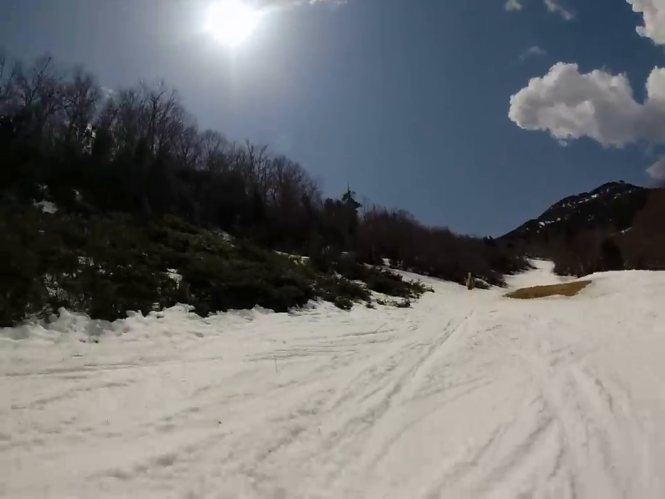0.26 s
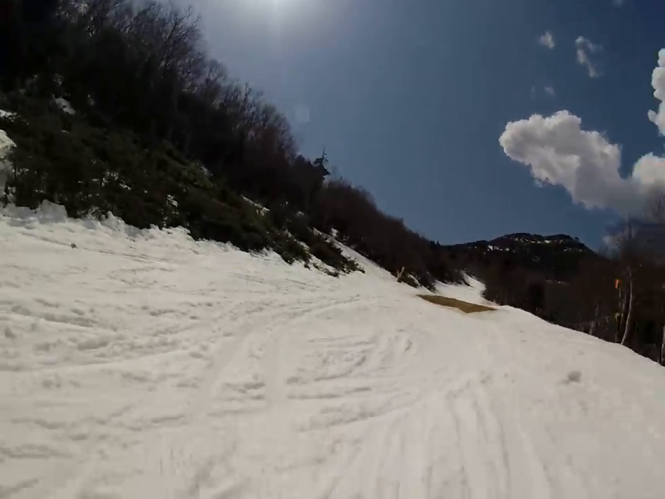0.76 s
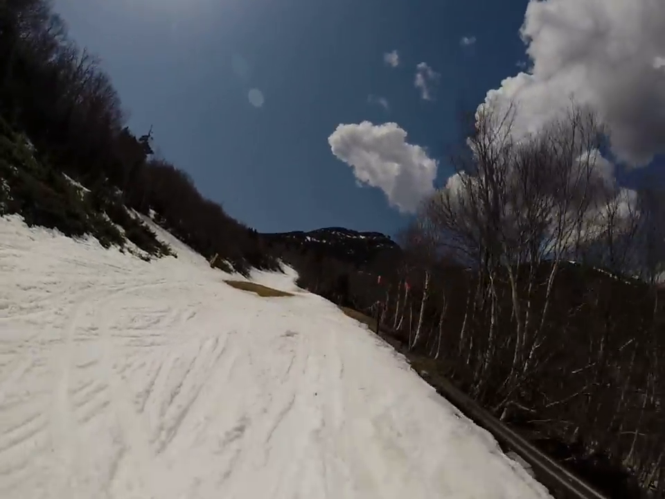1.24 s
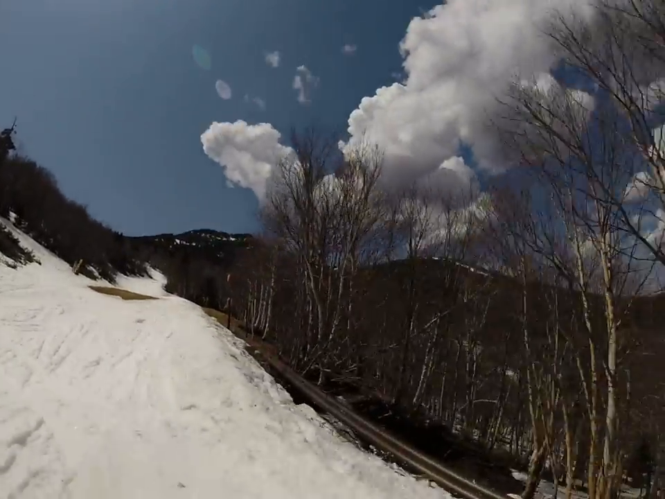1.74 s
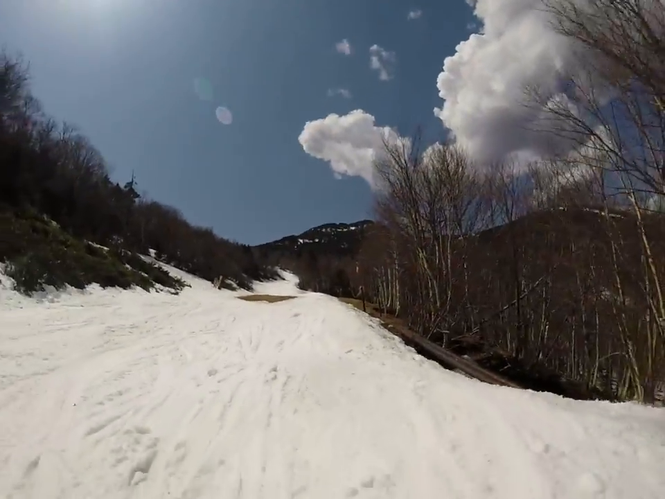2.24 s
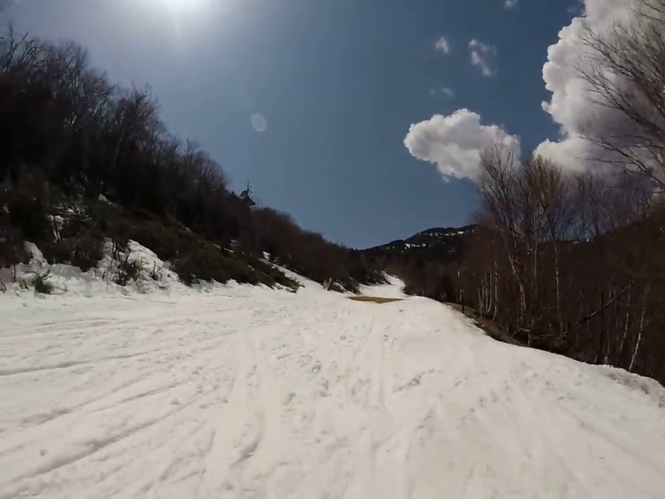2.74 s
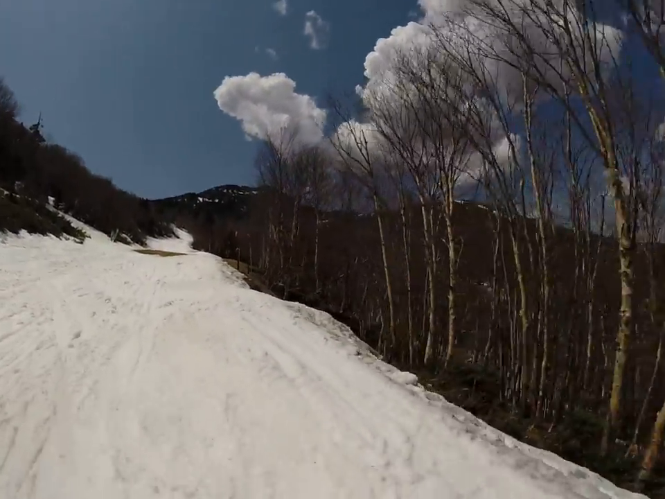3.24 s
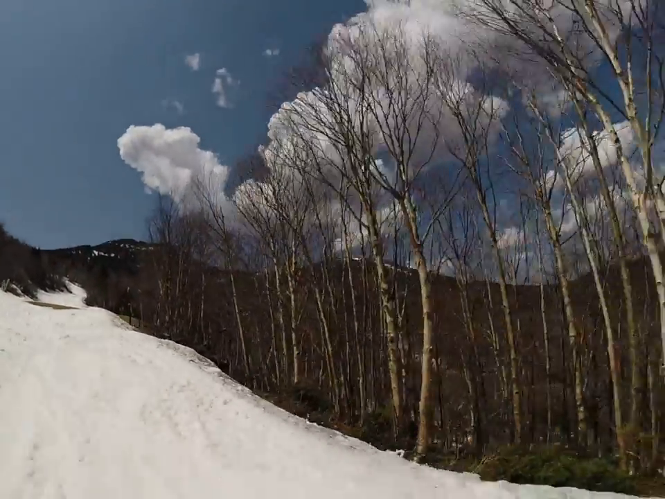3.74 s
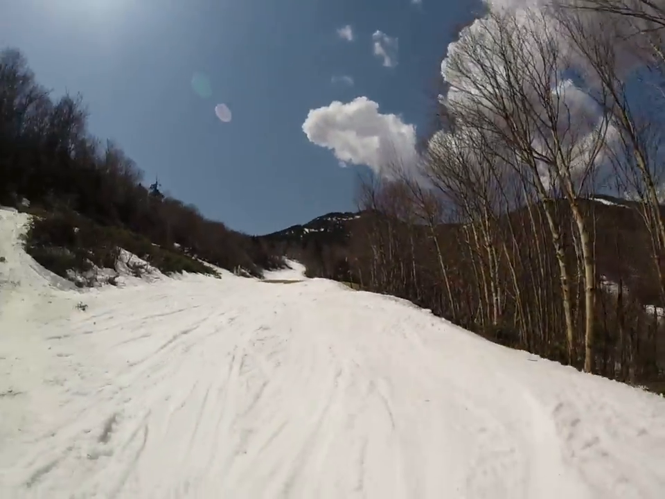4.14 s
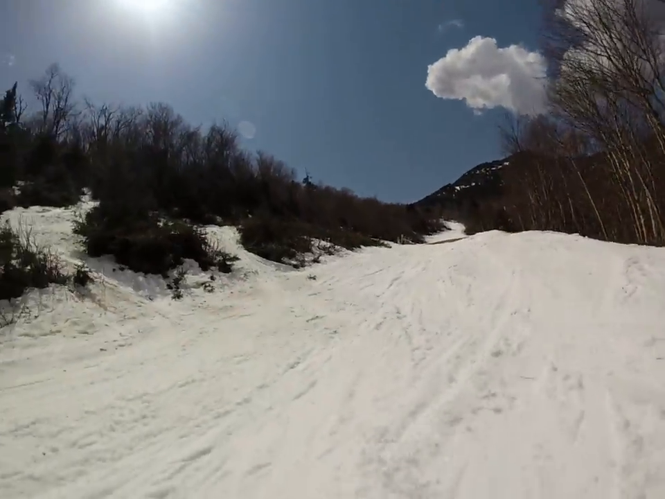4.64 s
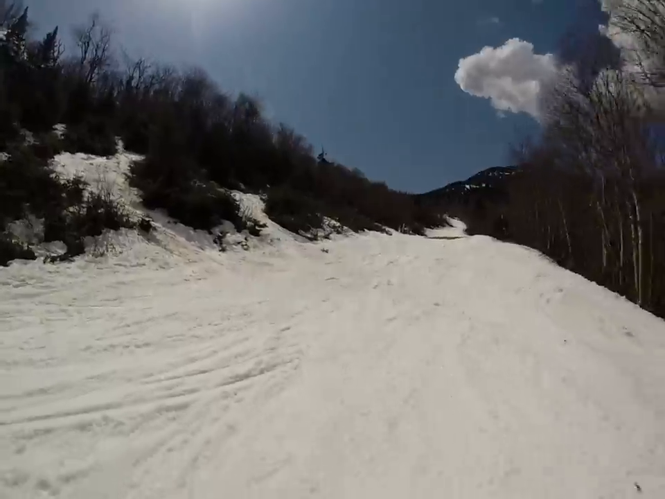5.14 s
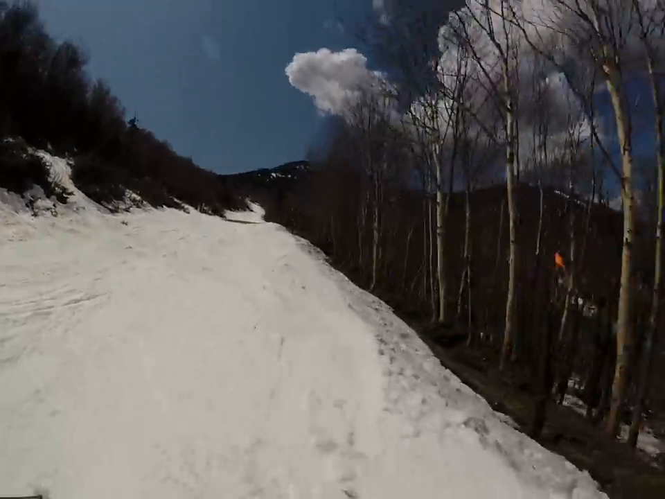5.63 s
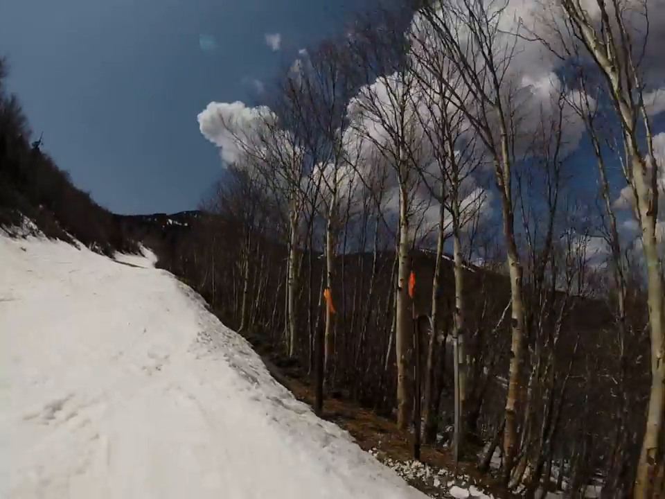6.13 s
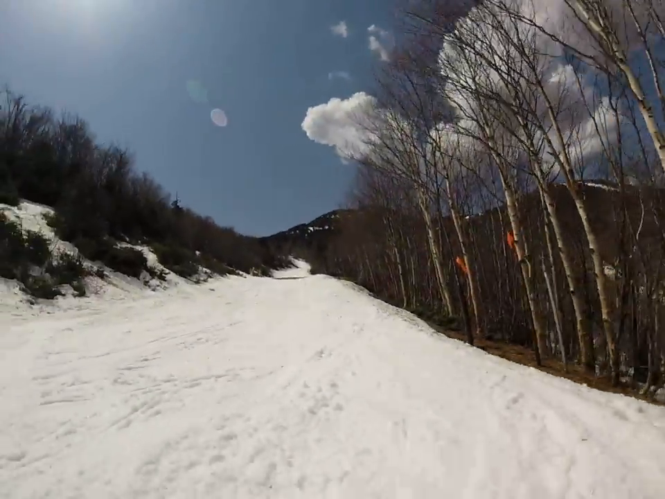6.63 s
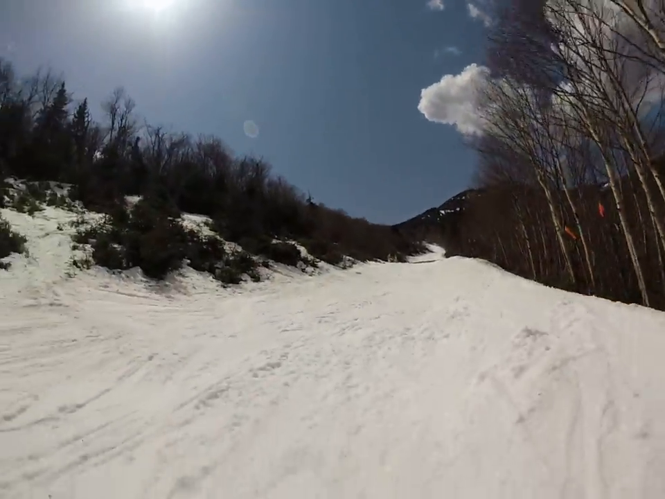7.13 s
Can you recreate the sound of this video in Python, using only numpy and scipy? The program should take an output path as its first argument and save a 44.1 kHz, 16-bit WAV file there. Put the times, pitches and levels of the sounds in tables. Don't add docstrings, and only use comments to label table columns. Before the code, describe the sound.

Heard from inside a small plastic camera case on a skier's helmet: slush scrapes and hisses under the skis in uneven surges, with wind rumbling and fluttering behind. A sharp knock of the mount comes early, another mid-run and a third near the end, with small taps, rattles and dull jolts between. The wettest, crunchiest carve comes around six seconds.

```python
import sys
import numpy as np
from scipy import signal
from scipy.fft import rfft, irfft, next_fast_len
from scipy.io import wavfile
from scipy.ndimage import uniform_filter1d, map_coordinates

SR = 44100
rng = np.random.default_rng(int(sys.argv[2]) if len(sys.argv) > 2 else 0)


def gain_from_decibels(decibels):
    exponent = np.asarray(decibels, float) / 20
    return 10 ** exponent


def persist_wave(psi):
    counts = np.round(np.clip(psi, -1, 1) * 32767).astype(np.int16)
    wavfile.write(sys.argv[1], SR, np.atleast_2d(counts).T)


N = 325458

# f/Hz, level/dB per Hz
AIR_RUSH = [(88, -31), (150, 9.5), (974, -12), (1550, -9), (1840, 1), (2270, -11), (2760, -22), (7230, -8),
            (8440, -41), (13100, -41), (15000, -39)]
# f/Hz, level/dB per Hz
BUFFET = [(5.9, -64), (10, 11.5), (27, 12), (41, -15), (81, -11), (139, -22), (224, -28.5), (576, -32.5),
          (700, -34), (910, -38.5), (1540, -120)]
# start t/s, end t/s, buffet level/dB
GUSTS = [(.62, .66, -38.5), (.81, .85, -35), (.95, 1.09, -37), (1.18, 1.23, -37.5), (1.33, 1.36, -39),
         (1.53, 1.62, -31), (1.75, 1.82, -32.5), (1.99, 2.02, -41.5), (2.45, 2.48, -31),
         (2.52, 2.75, -38.5), (2.98, 3.2, -38), (3.32, 3.34, -30), (3.52, 3.58, -30.5), (3.98, 4.25, -36.5),
         (4.44, 4.66, -38), (4.74, 4.76, -29), (4.87, 4.9, -33), (5.05, 5.14, -38), (5.34, 5.37, -38),
         (5.47, 5.5, -37), (5.76, 5.87, -38), (5.95, 6.05, -38), (6.08, 6.18, -35), (6.43, 6.57, -34.5),
         (6.67, 6.69, -42), (6.75, 6.77, -36), (6.89, 7.2, -37.5), (7.32, 7.38, -36)]
# f/Hz, width/Hz, level/dB
SWAY = [(39.2, 7, 0)]
# f/Hz, level/dB per Hz
HISS = [(1500, -26), (3500, -3), (6500, -1.5), (7600, 0), (8300, -8.5), (10000, -10), (12500, -15),
        (15500, -20.5)]
# t/s, hiss level/dB
AIRFLOW = [(0.0, -61), (0.12, -59.5), (0.45, -63), (1.3, -64.5), (1.72, -56), (2.2, -71), (2.45, -59),
           (3.0, -69.5), (3.3, -60), (3.55, -58.5), (4.12, -67.5), (4.4, -59), (5.06, -59), (5.14, -67),
           (5.9, -59), (6.7, -63), (7.0, -57), (7.38, -61)]
# t/s, length/s, change/dB
SHELTER = [(.83, 0.046, -4), (0.9, 0.13, 5), (1.362, 0.068, -5), (1.46, 0.085, -1.5), (1.62, 0.12, -9),
           (2.238, 0.028, 5), (2.336, 0.094, -4), (3.048, 0.055, 6), (3.13, .04, -6), (3.167, 0.024, 5),
           (3.204, 0.036, -5), (5.528, .04, 0), (5.59, 0.026, -7), (5.64, 0.038, 4), (6.157, 0.098, -5),
           (6.22, 0.021, 7), (6.75, 0.04, -5), (7.196, 0.15, -4.5)]

# t/s, peak level/dB, direction, f/Hz
JOLTS = [(0.0035, -26, 1, 116.6), (0.429, -31, -1, 129), (0.9993, -33, 1, 85), (1.074, -35, -1, 70),
         (1.153, -27.5, -1, 115), (1.19, -27, -1, 90), (1.5423, -30, -1, 124), (1.76, -17, 1, 47.7),
         (1.79, -20, -1, 69), (2, -24.5, -1, 78.5), (2.1283, -27.5, -1, 91.5), (2.471, -24, -1, 46.3),
         (2.4833, -33, 1, 60), (2.702, -35, 1, 98), (3.024, -32, 1, 71), (3.093, -29, -1, 84),
         (3.467, -21, -1, 70), (3.525, -24, -1, 75), (3.543, -24, 1, 70), (3.5716, -27, -1, 126),
         (3.592, -22, -1, 59.7), (3.994, -31.5, -1, 107), (4.5, -33.5, -1, 120), (4.745, -45, -1, 42),
         (5.7125, -30, 1, 110), (5.742, -32.5, 1, 116), (5.966, -22, -1, 43), (5.989, -37, -1, 37.8),
         (6.02, -21, -1, 37.8), (6.057, -20, -1, 30), (6.085, -21, -1, 33), (6.1145, -15.5, -1, 45),
         (6.141, -20, -1, 46.3), (6.164, -18, -1, 42.3), (6.2614, -24.5, -1, 58.6),
         (6.41, -26.5, -1, 114.8), (6.4376, -27, -1, 61.6), (6.9585, -31.5, 1, 123), (6.994, -30, -1, 117),
         (7.0275, -30.5, -1, 126), (7.115, -25, -1, 61)]
# t/s, peak level/dB, direction, f/Hz
STRAP_SLAPS = [(0.8, -36, -1, 200), (0.851, -43, -1, 260), (0.893, -34.5, 1, 340), (0.917, -35, 1, 280),
               (0.945, -41, 1, 185.2), (1.354, -37, -1, 400), (1.761, -34, 1, 230), (2.128, -30.5, -1, 380),
               (2.7, -35, 1, 170), (2.66, -37, -1, 220), (2.468, -31, -1, 242), (3.005, -42, -1, 230),
               (4.06, -39, -1, 320), (4.085, -33, -1, 382), (4.106, -32.5, -1, 220), (4.754, -27.5, 1, 202),
               (5.411, -44, -1, 220), (5.432, -40, -1, 252), (5.66, -36, -1, 230), (5.693, -34, -1, 230),
               (6.112, -24, -1, 150), (7.111, -26.5, 1, 133)]
# f/Hz, level/dB, t60/s
POLE_MODES = [(1020, -15, 0.007), (1530, 3.5, 0.016), (2070, 3, 0.012), (2450, -12, 0.012),
              (3660, -18, .007), (2870, -3, 0.014), (3280, -9, 0.012), (4440, -4, 0.0079),
              (5700, -11, 0.0041)]
# t/s, peak level/dB
LATCH_THROWN = [
    (0.001, -34),
    (0.367, -32),
    (3.3907, -29),
    (7.183, -28),
]
# t/s, peak level/dB
TAPS = [(0.215, -23.5), (0.3067, -30), (0.3192, -28), (0.395, -31), (0.8904, -36), (1.173, -29),
        (1.3209, -33), (1.5598, -24.5), (1.5958, -26), (1.6631, -32), (1.7587, -22), (2.317, -37),
        (2.9003, -34), (3.011, -35), (3.2965, -30), (3.4805, -29), (3.5064, -33), (3.536, -20),
        (3.5464, -29), (3.5553, -26), (3.5644, -23.5), (3.5754, -23), (3.5844, -30), (3.9679, -32),
        (4.186, -29), (4.4605, -31), (4.4947, -35), (4.6244, -29), (4.6528, -32), (4.6713, -25),
        (4.7516, -32), (4.8384, -31), (5.0569, -29), (5.9484, -32), (6.0533, -22), (6.141, -23),
        (6.1804, -29), (6.3749, -36), (6.9431, -25.5), (7.2085, -37), (7.2335, -35)]
# t/s, peak level/dB, thud level/dB, wall level/dB, tick level/dB
KNOCKS_IN = [(0.1199, -53, -37.5, -40, -28.5), (0.3645, -4.5, -32, -21.5, -26.5),
             (0.9199, -31, -41, -57, -51), (1.1725, -33, -48, -62, -37), (1.214, -35, -56, -62, -37),
             (2.3178, -37, -57, -49, -62), (2.9002, -43, -50, -63, -58), (3.2968, -34, -64, -57, -55),
             (3.3191, -39, -33.5, -34.5, -59), (5.012, -30, -33, -44, -31), (5.616, -31.5, -48, -61, -46),
             (6.1403, -28, -66, -50, -39), (6.212, -50, -55, -60, -40), (6.526, -39, -60, -57, -38),
             (6.539, -37, -68, -57, -36), (6.5515, -32, -46, -49, -30.5), (7.1778, -5, -26.5, -17, -25),
             (7.294, -46, -59, -61, -31.5)]
# t/s, peak level/dB, thud level/dB, wall level/dB, tick level/dB
KNOCKS_OUT = [(-0.0008, -27, -28.5, -24.5, -35), (1.5072, -29, -48, -51, -36),
              (3.3855, -13, -28.5, -19.5, -31), (3.4173, -33, -32, -31, -55), (3.4609, -42, -32, -36, -51),
              (3.4628, -26, -50, -50, -51), (3.5151, -30, -32, -28, -47), (3.5358, -45, -50, -36, -50),
              (3.5375, -31, -30.5, -30.5, -44), (3.633, -47, -66, -68, -34), (4.625, -41, -70, -38, -43),
              (6.5816, -37, -43, -30.5, -58), (7.1796, -17.5, -60, -44, -40)]

CAVITY = [(2125, 252, 5), (2342, 214, 7.5), (2903, 300, -11.5)]
# f/Hz, width/Hz, level/dB
WALLS = [(690, 110, 5), (882, 200, 0), (1520, 240, 5.5)]
# f/Hz, width/Hz, level/dB
THUD = [(117, 55, 0)]
# f/Hz, width/Hz, level/dB
EDGES = [(3330, 240, -7), (4540, 190, -8.5), (5180, 130, -11.5), (5630, 280, -17.5), (7060, 450, -20.5)]
# f/Hz, width/Hz, level/dB
DOOR = [(560, 30, -5)]
# f/Hz, width/Hz, level/dB
WALL_PUSH = [(415, 3400, 0)]
# f/Hz, width/Hz, level/dB
LENS_RIM = [(3330, 240, 0), (3690, 100, -4)]
# f/Hz, width/Hz, level/dB
PORT = (9120, 140, -4)
FAMILY_LAGS = [.00008, .0001, .00014, .0008, .00178, 0, .0002]
# f/Hz, width/Hz
GAPS_AIR = [(1860, 90)]
# f/Hz, width/Hz
GAPS_KNOCK = [(225, 110), (480, 90), (1110, 200), (1875, 110), (3900, 200), (5620, 200)]
# f/Hz, width/Hz
GAPS_SPRAY = [(3560, 150), (5150, 200)]
# f/Hz, width/Hz
GAPS_SEAMS = [(5150, 250), (6700, 300), (7800, 600)]

# f/Hz, level/dB per Hz
SLUSH = [(250, -13.5), (500, -10), (900, -5), (1300, -3.5), (2000, -3.5), (3000, -10), (4500, -15.5),
         (7000, -38.5)]
# f/Hz, width/Hz, level/dB
SPRAY_PEAKS = [(1880, 250, 14), (3070, 1000, 5.5), (3480, 120, -5), (4540, 800, -4.5), (5490, 500, 4),
               (6300, 540, -1.5), (6980, 490, -5)]
# f/Hz, width/Hz, level/dB
SHAVING = [(3040, 840, 5), (3900, 290, -2)]
# f/Hz, width/Hz, level/dB over the scrape
SKI_RING = (1535, 115, 7.6)
# f/Hz, width/Hz, level/dB over the scrape
SKI_FLEXED = (1360, 390, 1.4)
# t/s, level/dB
RING_FREEDOM = [(0, -8), (.5, 2), (1.4, -2.5), (1.7, 1), (2.3, -4), (2.6, -1), (3.2, -4), (3.5, -10),
                (4.2, 1.5), (4.5, 2.5), (5.0, -1.5), (5.3, -2.5), (5.6, -6), (6.1, 2), (6.4, -9), (6.8, 4),
                (7.1, -8), (7.38, -7)]
# start t/s, end t/s, level/dB
BENDS = [
    (4.62, 4.66, -25),
    (4.82, 5.1, -4),
    (6.2, 6.35, -18),
    (6.95, 7.16, -2.5),
    (7.3, 7.38, -1),
]
# start t/s, end t/s, scrape level/dB, spray level/dB
TURNS = [
    (0.05, 0.33, -46, -55.5),
    (1.62, 1.9, -44.5, -44),
    (3.62, 3.86, -54, -47),
    (4.62, 5.07, -41, -52.5),
    (6.0, 6.17, -41, -42.5),
    (6.21, 6.3, -41, -44),
    (6.95, 7.07, -45, -65),
]
# start t/s, end t/s, scrape level/dB, spray level/dB
PATCHES = [(.58, .6, -52.5, -56), (.7, .76, -52.5, -57), (.9, 1.04, -52.5, -57), (1.2, 1.31, -54.5, -55),
           (1.37, 1.43, -60, -53), (1.52, 1.56, -44.5, -50.5), (2.11, 2.14, -52, -52.5),
           (2.3, 2.39, -57, -81), (2.44, 2.52, -49.5, -57.5), (2.6, 2.7, -48.5, -59), (2.8, 2.93, -58, -76),
           (3.03, 3.07, -54, -63), (3.27, 3.49, -54.5, -53), (3.52, 3.57, -43, -45.5),
           (3.77, 3.83, -49, -48.5), (4.08, 4.12, -60, -53.5), (4.2, 4.34, -64, -52.5),
           (4.38, 4.55, -54.5, -54.5), (5.1, 5.15, -64, -71), (5.32, 5.42, -50.5, -62),
           (5.62, 5.78, -51, -52), (5.83, 5.92, -57, -51), (6.4, 6.46, -48.5, -49),
           (6.55, 6.76, -52.5, -55), (6.87, 6.895, -37.5, -51), (6.98, 7.02, -43, -45),
           (7.12, 7.15, -44.5, -51), (7.2, 7.38, -51, -54.5)]
# start t/s, end t/s, buzz level/dB
RATTLES = [(0, .19, -52), (.21, .34, -39.5), (.37, .43, -43.5), (.66, .98, -55), (1.04, 1.08, -43),
           (1.17, 1.19, -41.5), (1.28, 1.31, -44), (1.53, 1.62, -42.5), (1.74, 1.77, -43),
           (1.82, 1.99, -44), (2.12, 2.14, -48), (2.25, 2.26, -48), (2.33, 2.67, -55), (3.04, 3.09, -48.5),
           (3.28, 3.33, -48), (3.46, 3.51, -47), (3.545, 3.577, -40.5), (3.95, 3.98, -50.5),
           (4.09, 4.22, -50.5), (4.45, 4.5, -45), (4.655, 4.72, -37.5), (4.8, 4.94, -44), (5.05, 5.09, -43),
           (5.36, 5.47, -48.5), (5.6, 5.92, -53.5), (5.91, 6.0, -46), (6.05, 6.17, -43), (6.19, 6.3, -44.5),
           (6.38, 6.42, -39), (6.62, 6.68, -55), (6.87, 6.95, -44), (7.0, 7.27, -52)]
# start t/s, end t/s, spray level/dB, shaving level/dB
CLODS = [(1.505, 1.52, -54, -55), (1.68, 1.72, -47, -53), (1.78, 1.84, -46.5, -55),
         (2.098, 2.125, -53, -56), (3.55, 3.585, -54, -58), (4.615, 4.64, -58, -47),
         (4.66, 4.76, -54, -47.5), (4.82, 4.85, -57, -48), (4.92, 4.99, -63, -56), (5.945, 5.96, -46, -50),
         (6.015, 6.035, -37.5, -44), (6.052, 6.064, -39, -49), (6.09, 6.122, -37, -49),
         (6.134, 6.152, -37, -51), (6.18, 6.2, -41, -59), (6.222, 6.24, -40, -56), (6.27, 6.285, -50, -62),
         (6.875, 6.89, -44, -51), (7.05, 7.07, -55, -49), (7.11, 7.15, -63, -56), (7.29, 7.3, -47, -56)]


def unit(x):
    return x / np.sqrt(np.mean(x ** 2) + 1e-20)


def colour(points):
    f, db = np.transpose(points)
    return lambda hz: gain_from_decibels(np.interp(np.log(hz + 1), np.log(f + 1), db))


def modes(table):
    def response(f):
        total = 0
        for k, (centre, width, db) in enumerate(table):
            damped = 1j * f * width
            total = total + (-1) ** k * gain_from_decibels(db) * damped / (centre * centre - f * f + damped)
        return total
    return response


def gaps(table, left=0.15):
    def response(f):
        passed = 1
        for centre, width in table:
            detuned = centre * centre - f * f
            passed = passed * (detuned + 1j * left * f * width) / (detuned + 1j * f * width)
        return passed
    return response


def filtered(x, response):
    m = next_fast_len(N + SR // 2)
    return irfft(rfft(x, m) * response(np.fft.rfftfreq(m, 1 / SR)), m)[:N]


def wobble(rate):
    at = np.arange(0, N + 8, 8)
    knots = rng.standard_normal(int(N * rate / SR) + 4)
    return np.interp(np.arange(N), at, map_coordinates(knots, [at * rate / SR]))


def grit(patchy_db, grain_db):
    grains = rng.standard_normal(N) * gain_from_decibels(grain_db * wobble(900))
    z = signal.stft(grains, nperseg=512)[2]
    field = uniform_filter1d(rng.standard_normal(z.shape), size=8, axis=0)
    field = uniform_filter1d(field, size=8, axis=1)
    return signal.istft(z * gain_from_decibels(patchy_db * unit(field)), nperseg=512)[1][:N]


def swells(table, rise, fall, rest_db):
    t = np.arange(0, N, 64) / SR
    start, end, *levels = np.transpose(table)[:, :, None]
    away_db = -rise * np.maximum(start - t, 0) - fall * np.maximum(t - end, 0)
    curves = []
    for db, rest in zip(levels, rest_db):
        power = gain_from_decibels(2 * rest) + gain_from_decibels(2 * (db + away_db)).sum(axis=0)
        curves.append(np.interp(np.arange(N) / SR, t, 10 * np.log10(power)))
    return curves


def air_rush():
    return gain_from_decibels(-67.0) * unit(filtered(grit(.4, .6), colour(AIR_RUSH)))


def airflow():
    t = np.arange(0, N, 64) / SR
    db = np.interp(t, *np.transpose(AIRFLOW))
    for s, length, change_db in SHELTER:
        db = db + change_db * np.maximum(1 - np.abs(t - s) / length, 0)
    return np.interp(np.arange(N) / SR, t, gain_from_decibels(db))


def wind(spray_gain):
    calm_db = -42
    gust_db, = swells(GUSTS, 260, 210, (calm_db,))
    gust = gain_from_decibels(gust_db)
    low = lambda f: 1 / (1 + (f / 70) ** 4)
    thumps = filtered(grit(0.92, 1.6), lambda f: colour(BUFFET)(f) * low(f))
    thumps = unit(gain_from_decibels(0.35 * wobble(15)) * thumps)
    rocking = gain_from_decibels(6.0) * gust ** 1.378 * unit(filtered(rng.standard_normal(N), modes(SWAY)))

    flutter_db = -54 + 0.047 * (gust_db - calm_db)
    flap = np.hypot(gain_from_decibels(flutter_db), gain_from_decibels(-6) * spray_gain)
    lumps = gain_from_decibels(1.46 * wobble(14) + 3.3 * wobble(40))
    flutter = filtered(grit(0.36, 0.68), lambda f: colour(BUFFET)(f) * (1 - low(f)))
    flutter = unit(lumps * flutter)

    hiss = gain_from_decibels(1.03 * wobble(25) + 0.97 * wobble(41)) * filtered(grit(0.53, 0.86), colour(HISS))
    return gain_from_decibels(-3.5) * gust * thumps + rocking + flap * flutter + gain_from_decibels(6.5) * airflow() * unit(hiss)


def jolts():
    half = SR // 10
    out, t = np.zeros(N + 2 * half), np.arange(-half, half) / SR
    bottoming = 0.86 * gain_from_decibels(-60 * np.abs(t) / 0.009) * np.cos(2 * np.pi * 260 * t)
    for s, db, direction, hz in JOLTS + STRAP_SLAPS:
        cycles = np.where(t < 0, 2.5, 4.5)
        swing = gain_from_decibels(-60 * np.abs(t) * hz / cycles) * np.cos(2 * np.pi * hz * t)
        crest = (direction > 0) * bottoming
        out[round(s * SR):][:2 * half] += np.sign(direction) * gain_from_decibels(db - 4.0) * (swing + crest)
    return out[half:half + N]


def pole():
    out, t = np.zeros(N), np.arange(SR // 20) / SR
    ring = sum(gain_from_decibels(db - 60 * t / t60) * np.sin(2 * np.pi * hz * t) for hz, db, t60 in POLE_MODES)
    onset = 1 - np.exp(-t / 0.00043)
    out[round(5.0122 * SR):][:len(t)] = gain_from_decibels(-15.5) * ring * onset
    return out


def latch():
    hz, rise_s, t60_s = 1797, 0.0012, 0.031
    out, t = np.zeros(N), np.arange(SR // 20) / SR
    ring = gain_from_decibels(-60 * t / t60_s) * (1 - np.exp(-t / rise_s)) * np.sin(2 * np.pi * hz * t)
    for s, db in LATCH_THROWN:
        out[round(s * SR):][:len(t)] += gain_from_decibels(db + 7.5) * ring
    return out


def taps():
    rise_s, t60_s = 0.00057, 0.025
    blows, t = np.zeros(N), np.arange(SR // 20) / SR
    s, db = np.transpose(TAPS)
    blows[np.round(s * SR).astype(int)] = gain_from_decibels(db - 5)
    envelope = gain_from_decibels(-60 * t / t60_s) * (1 - np.exp(-t / rise_s))
    shake = signal.fftconvolve(blows, envelope)[:N]
    return shake * unit(filtered(rng.standard_normal(N), modes(CAVITY)))


def settling():
    delay_s, t60_s = .003, 0.014
    blows = np.zeros(N)
    for s, db, *_ in KNOCKS_IN + KNOCKS_OUT:
        blows[round(s * SR + delay_s * SR)] = gain_from_decibels(db)
    shiver = signal.fftconvolve(blows, gain_from_decibels(-60 * np.arange(SR // 20) / SR / t60_s))[:N]
    soft_cavity = lambda f: modes(CAVITY)(f) / (1 + 1j * f / 3500) ** 2
    return gain_from_decibels(-1.5) * filtered(shiver * rng.standard_normal(N), soft_cavity)


def knock_levels(table, push_db):
    rows = np.array(table)
    peak_db, wall_db = rows[:, 1], rows[:, 3]
    door = np.hypot(gain_from_decibels(peak_db - 41), gain_from_decibels(wall_db - 16))
    return np.column_stack([rows, 20 * np.log10(door), wall_db + push_db, peak_db - 21])


def mount():
    out, early = np.zeros(N), SR // 100
    # family, boost/dB, contact softness/Hz, damping
    families = [(CAVITY, 3, 3300, .8), (THUD, 9, 420, .71), (WALLS, 1, 2300, .9), (EDGES, -2, 6500, .71),
                (DOOR, 7, 3200, .71), (WALL_PUSH, 4, 2000, 1.5), (LENS_RIM, 0, 5000, 1.4)]
    directions = [(1.0, knock_levels(KNOCKS_IN, -1)), (-1.11, knock_levels(KNOCKS_OUT, 4))]
    for column, ((family, boost_db, soft_hz, damping), lag) in enumerate(zip(families, FAMILY_LAGS)):
        blows = np.zeros(N)
        for sign, rows in directions:
            at = np.round(rows[:, 0] * SR).astype(int) + early
            blows[at] = sign * gain_from_decibels(rows[:, column + 1])

        def ring(f):
            s = 1j * f / soft_hz
            contact = 1 / (1 + damping * s + s ** 2) ** 2
            return modes(family)(f) * np.exp(-2j * np.pi * f * lag) * contact

        peak = np.abs(irfft(ring(np.fft.rfftfreq(SR, 1 / SR)))).max()
        out += gain_from_decibels(boost_db) / peak * filtered(blows, ring)
    out = filtered(out, gaps(GAPS_KNOCK, left=0.44))
    return np.pad(out[early:], (0, early))


def spray_band(low_hz):
    def response(f):
        body = modes(SPRAY_PEAKS)(f) * gaps(GAPS_SPRAY)(f)
        return body * f ** 2 / (f ** 2 + low_hz ** 2) / (1 + (f / 7800) ** 8)
    return response


def clods():
    spray_db, shaving_db = swells(CLODS, 1700, 1800, (-120, -75))
    crushed = grit(0.53, 3)
    shaved = filtered(crushed[::-1], lambda f: modes(SHAVING)(f) / (1 + (f / 4500) ** 6))
    spray = filtered(crushed, spray_band(1500))
    return gain_from_decibels(spray_db) * unit(spray) + gain_from_decibels(shaving_db) * unit(shaved)


def load():
    turns = swells(TURNS, 98, 76, (-57, -58.5))
    patches = swells(PATCHES, 164, 270, (-120, -120))
    return [np.hypot(gain_from_decibels(a), gain_from_decibels(b)) for a, b in zip(turns, patches)]


def skis(scrape_gain, spray_gain):
    chatter = wobble(25)
    slush = filtered(grit(0.71, 1.26), colour(SLUSH))
    free = gain_from_decibels(np.interp(np.arange(N) / SR, *np.transpose(RING_FREEDOM)))
    free = free / (1 + (spray_gain / gain_from_decibels(-49)) ** 2)
    bent = gain_from_decibels(swells(BENDS, 200, 220, (-20,))[0])
    ringing = free * filtered(slush, modes([SKI_RING])) + bent * filtered(slush, modes([SKI_FLEXED]))
    scrape = gain_from_decibels(0.84 * chatter + 1.8 * wobble(60)) * (slush + ringing)

    buzz = gain_from_decibels(0.64 * chatter + 1.5 * wobble(77)) * filtered(grit(0.24, 1.3), modes(CAVITY))
    rattle_db, = swells(RATTLES, 260, 340, (-56,))
    shake = np.hypot(gain_from_decibels(rattle_db), gain_from_decibels(-5.5) * spray_gain)

    spray = gain_from_decibels(0.25 * chatter + 1.5 * wobble(45)) * filtered(grit(0.23, 2.6), spray_band(1700))
    return gain_from_decibels(0.5) * scrape_gain * unit(scrape) + spray_gain * unit(spray) + shake * unit(buzz)


def scene():
    scrape_gain, spray_gain = load()
    outside = air_rush() + wind(spray_gain) + clods() + skis(scrape_gain, spray_gain)
    inside = jolts() + pole() + latch() + taps() + settling() + mount()
    case = lambda f: gaps(GAPS_AIR)(f) * gaps(GAPS_SEAMS, left=.6)(f) * (1 + modes([PORT])(f))
    return (filtered(outside, case) + inside)[None]


def low_pass(x):
    return signal.sosfilt(signal.butter(12, 15200, fs=SR, output="sos"), x)


def record(dry):
    mix = filtered(dry[0], lambda f: 1 / (1 + (f / 15200) ** 300))[None]
    return low_pass(mix)


dry = scene()
out = record(dry)
persist_wave(out)
```